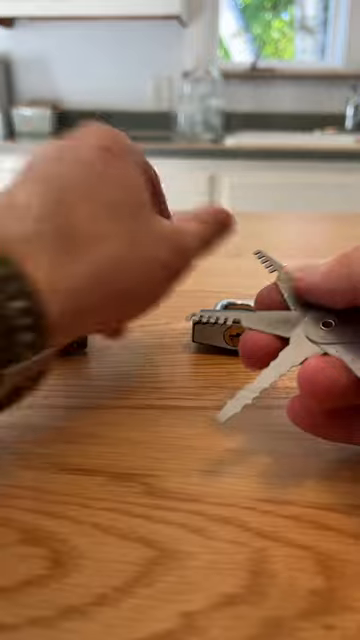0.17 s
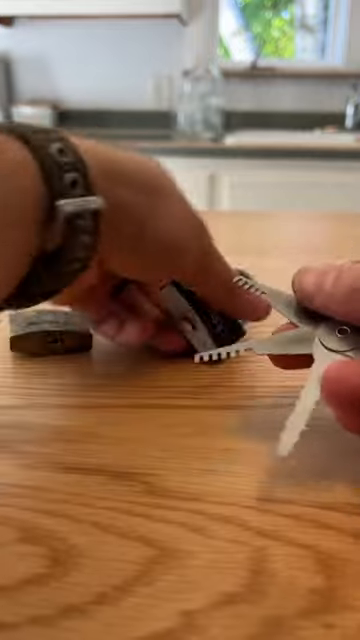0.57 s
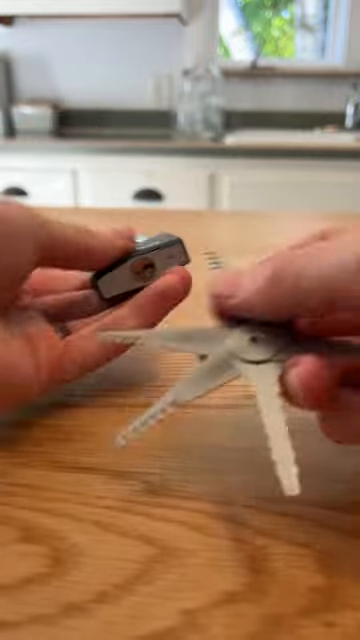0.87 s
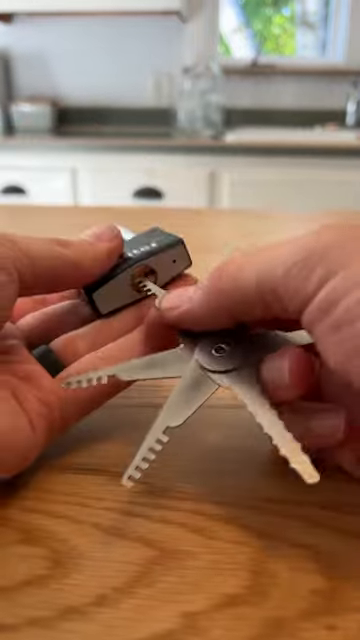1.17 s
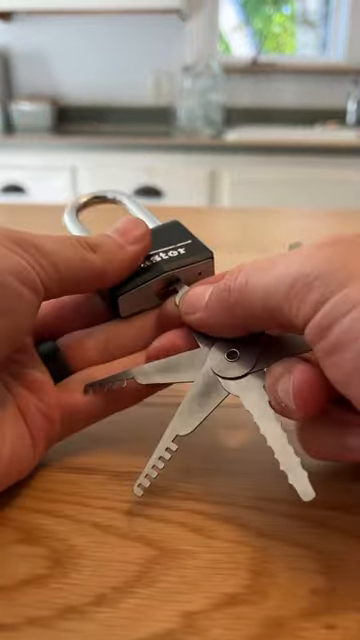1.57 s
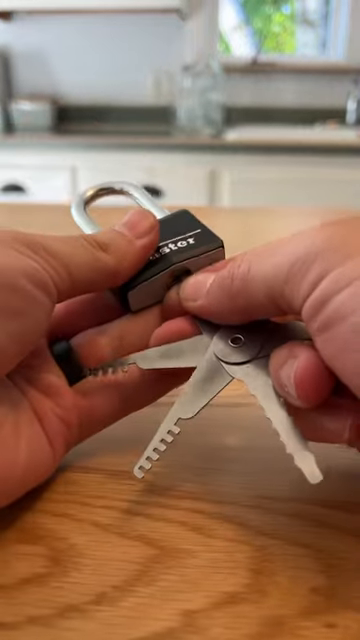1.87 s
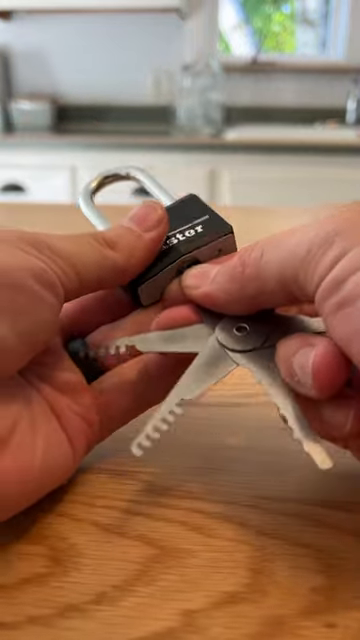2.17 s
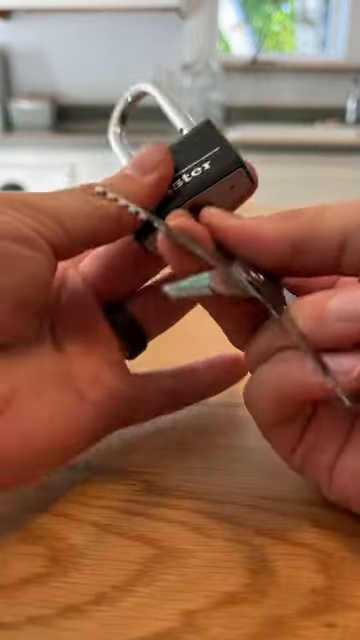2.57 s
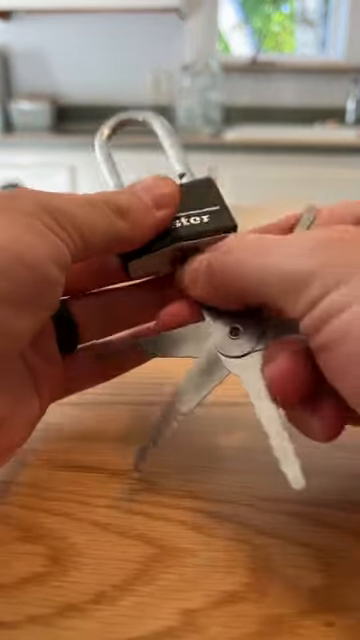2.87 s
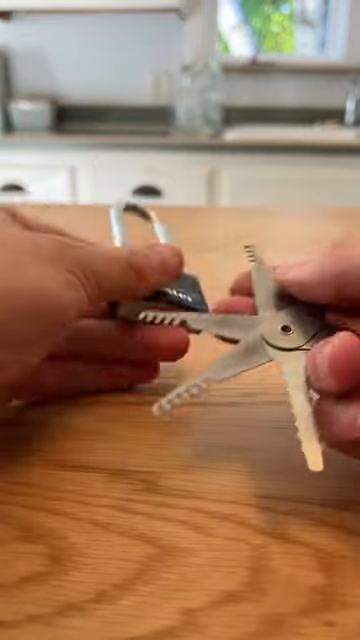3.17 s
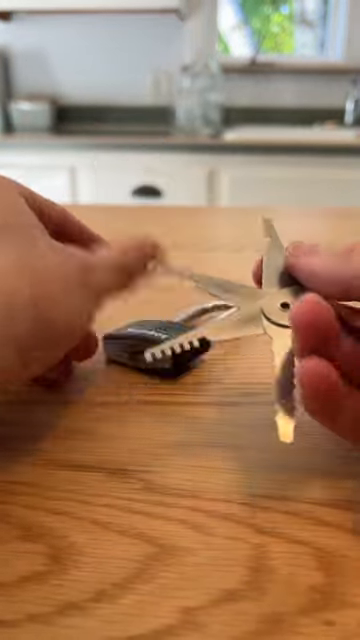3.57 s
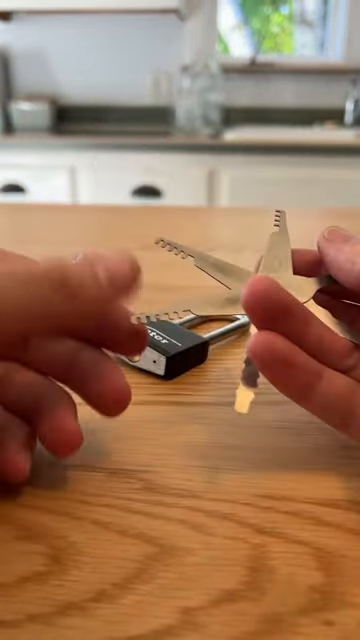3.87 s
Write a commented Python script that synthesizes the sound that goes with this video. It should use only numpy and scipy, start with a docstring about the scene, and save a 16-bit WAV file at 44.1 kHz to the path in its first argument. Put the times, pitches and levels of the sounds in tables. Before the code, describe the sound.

A padlock is picked with small metallic clicks close to the microphone. First it bumps and slides on a wooden table, with a sharp click near 0.9 seconds. Light ticks and scrapes follow from 1.1 seconds, growing stronger until the shackle snaps open at about 2.5. More clicks come, then the lock clatters onto the table around 3.5 seconds. A faint appliance hum fills the slightly echoing kitchen.

```python
"""A hard, humming kitchen: a comb pick ticks inside a steel padlock close to the microphone, and the
shackle springs open. Before and after, the lock is dragged, lifted and dropped on a wooden table.
Ticks and slides are contact noise coloured by the steel; the pick's blade pings in two modes. Blows
ring the table's modes and dragging drives a gliding resonance. The walls answer over appliance hum."""
import sys
import numpy as np
from scipy import signal
from scipy.io import wavfile
from scipy.ndimage import uniform_filter1d

SR = 44100
rng = np.random.default_rng(int(sys.argv[2]) if len(sys.argv) > 2 else 0)


def dump_mix(stems):
    """Bounce the given channels to the path in sys.argv[1] as a 16-bit WAV at rate SR."""
    frames = np.atleast_2d(stems).T  # one column per channel
    limited = np.clip(frames, -1, 1)  # hard clip at full scale
    pcm = np.round(limited * 32767).astype(np.int16)
    wavfile.write(sys.argv[1], SR, pcm)


N = 176400
LEAD = 4410  # samples before time zero


def gain_of(db):
    return 10 ** (np.asarray(db) / 20)


def unit_rms(x):
    return x / np.sqrt(np.mean(x ** 2) + 1e-20)


def curve_at(points, hz):
    point_hz, value = np.transpose(points)
    return np.interp(np.log(hz + 1), np.log(point_hz + 1), value)


def add(mix, start_s, sound):
    part = mix[round(start_s * SR) + LEAD:][:len(sound)]
    part += sound[:len(part)]


def minimum_phase(db):
    log_gain = np.log(gain_of(np.maximum(db, -100)))
    full = np.concatenate([log_gain, log_gain[-2:0:-1]])
    return np.fft.ifft(np.exp(full - 1j * signal.hilbert(full).imag)).real[:1024]


def ring(modes, t):
    return sum(gain_of(db - 60 * t / t60) * np.sin(2 * np.pi * hz * t) for hz, db, t60 in modes)


# Lock body spectrum. Each row: frequency in Hz, relative level in dB.
STEEL_SPECTRUM = [(410, -52.5), (700, -14.5), (1160, -12.5), (2760, -8), (4630, -4), (5730, -11.5),
                  (7780, -12), (8660, -18), (10200, -17.5), (13800, -14), (15100, -15), (16200, -29.5)]

def steel_body(dull_db, bright_db, dull_hz=2970, bright_hz=8800):
    """Unit-energy impulse response of the lock, with a low and a high shelf."""
    hz = np.fft.rfftfreq(4096, 1 / SR)
    dull = 1 / (1 + (hz / dull_hz) ** 4)
    bright = 1 - 1 / (1 + (hz / bright_hz) ** 8)
    body = minimum_phase(curve_at(STEEL_SPECTRUM, hz) + dull * dull_db + bright * bright_db)
    return body / np.linalg.norm(body)


# Steel on steel. Each row: start in seconds, level in dB, low shelf in dB, high shelf in dB,
# contact time in ms.
STEEL_TICKS = [(0.225, -39, 6, -2, 1.8), (0.2964, -22.5, 7, 7.5, 1.7), (0.3007, -15.5, 5, -17, 1.1),
               (0.8609, -6, -19, -1, 0.19), (1.1267, -31, -54, 3, 1.4), (1.1878, -33.5, -21, -4, 0.39),
               (1.2942, -22.5, 8, -2, 0.86), (1.3035, -23.5, -4, -5, 0.44), (1.318, -36, -7, 2, 1.3),
               (1.333, -36, -15, -3.0, 1.3), (1.3454, -45, -13, -1, 1.3), (1.3588, -38.5, -18, -3.0, 1.6),
               (1.3713, -40, -24, 4, 1.3), (1.5921, -31.5, -3, -5, 0.96), (1.6024, -31.5, -21, 4, 4.1),
               (1.611, -27.5, -10, 6, 2.7), (1.614, -44, -23, 24, 1.9), (1.671, -47, -6, 9, 0.61),
               (1.7755, -32.5, 20, 0, 1.4), (2.0561, -15, 3, 0, 0.8), (2.0679, -24, -8.5, -7, 1.3),
               (2.2317, -14, -10, -6, 0.38), (2.2542, -15.5, 4, 7.5, 0.57), (2.325, -29.5, -6.5, 3, 0.68),
               (2.4075, -41, -11, -10, 4.8), (2.4445, -15.5, -10.5, -15, 2.5), (2.4522, 6, -3.5, 0.5, 0.64),
               (2.4561, -19.5, -10.5, -3.5, 1.5), (2.6766, -8, -12.5, 5.5, 1.3),
               (2.6808, -5, -8.5, -4, 0.53), (2.7053, -21, 12, 4, 0.79), (2.7352, -21.5, 4.5, 1, 1.15),
               (2.882, -23, -18.5, 5, 0.64), (2.9135, -21.5, -12, 1, 2.2), (2.9174, -15.5, -7, 12, 0.9),
               (2.9268, -23.5, -24, 12, 1.1), (3.1768, -22, -1.5, -11.5, 0.47),
               (3.3714, -17.5, 15, -11, 0.92), (3.434, -33.5, -6.5, -5, 1.3),
               (3.4645, -32.5, -8.5, -6.5, 1.5), (3.477, -4, 26.5, -1, 1.9), (3.5293, 4.5, -5, 2.5, 0.42),
               (3.5505, -19, -8, -11, 2.3), (3.5834, -1, 32, -11, 0.72), (3.6002, -3.5, 9, 2, 0.62),
               (3.6166, -14.5, -19, -6, 1.6), (3.6206, -14.5, -19.5, 2, 1.5)]

def steel_ticks():
    """Brief gritty contacts ring the lock. Returns direct sound and an equal-energy feed to the walls."""
    direct, to_walls = np.zeros((2, N + LEAD))
    t = np.arange(1024) / SR
    rows = [(-0.07, -10.5, 0, 0, 1.7)] + list(STEEL_TICKS)  # first tick echoes into the opening
    for start_s, db, dull_db, bright_db, contact_ms in rows:
        grit = rng.standard_normal(len(t))
        age = t / (contact_ms / 1000)
        contact = np.sign(grit) * np.sqrt(abs(grit)) * (1 - np.exp(-1.6 * age)) ** 2 * np.exp(-age)
        body = steel_body(dull_db, bright_db)
        tick = signal.fftconvolve(contact, body)
        gain = gain_of(db) * np.sqrt(contact_ms * SR / 6000)
        add(direct, start_s, gain * tick / np.linalg.norm(tick))
        add(to_walls, start_s, gain * body)
    return direct, to_walls


# Pick blade pings. Each row: start in seconds, level per mode in dB.
PICK_PINGS = [(1.594, -43), (1.613, -47), (1.761, -52), (1.775, -41.5), (1.7835, -42.5), (2.2324, -30),
              (2.253, -18.5), (2.42, -49.5), (2.4431, -16), (2.67, -33), (2.743, -39), (2.763, -38),
              (2.7755, -48)]

def pick_pings(blade_hz=4480, t60_s=0.014):
    """A close pair of damped blade modes, detuned by a different grip each time."""
    out, t = np.zeros(N + LEAD), np.arange(3000) / SR
    for start_s, db in PICK_PINGS:
        pair = [(blade_hz * (ratio + 0.01 * rng.standard_normal()), db, t60_s) for ratio in (0.98, 1.025)]
        add(out, start_s, ring(pair, t) * np.minimum(t / 0.00056, 1))
    return out


# Steel and fingers on steel. Each row: start in seconds, length in seconds, level in dB.
STEEL_SLIDES = [(0.294, 0.3, -52), (0.591, 0.036, -53.5), (0.672, 0.34, -57.5), (1.147, 0.019, -56),
                (1.275, 0.04, -51.5), (2.437, 0.04, -33), (2.691, 0.056, -46), (2.926, 0.024, -40.5),
                (3.538, 0.12, -39)]

def steel_slides():
    """Fine, uneven friction hiss under a soft arch, coloured by the lock."""
    out = np.zeros(N + LEAD)
    for start_s, length_s, db in STEEL_SLIDES:
        progress = np.arange(0, 1, 1 / (length_s * SR))
        hiss, roughness = rng.standard_normal((2, 16000))
        friction = hiss * np.exp(0.66 * unit_rms(uniform_filter1d(roughness, 90)))
        arch = np.sin(np.pi * progress ** 0.42) ** 0.5
        add(out, start_s, gain_of(db) * unit_rms(friction[:len(progress)]) * arch)
    return signal.oaconvolve(out, steel_body(dull_db=1.5, bright_db=0.1))[:len(out)]


# Modes of table and lock. Each row: frequency in Hz, relative level in dB, T60 in seconds.
WOOD_MODES = [(145.8, -15.5, 0.29), (191.7, -12, 0.17), (244.4, -5.5, 0.23), (281.2, 1, 0.1),
              (443, -1.5, 0.067), (780, -2.5, 0.073), (917, 0.5, 0.033), (1158, 8, 0.014),
              (1325, 3.5, 0.028), (1579, 8.5, 0.019), (1910, -1, 0.06), (2230, 10, 0.0089),
              (2500, 4, 0.014), (3470, 3.5, 0.007)]
BOOM_HZ, MAX_RING_CYCLES = 600, 24  # top of the boom band; damping by the hands
# Hard blows. Each row: start in seconds, level in dB, boom in dB, tilt above the boom in dB per octave.
TABLE_KNOCKS = [(0.073, -28.5, 12, -3), (0.2152, -27, 14, -4.5), (0.2963, -12.5, -1.5, -9),
                (0.685, -20, 16.5, -9), (0.8595, -16, -6.5, -3.5), (3.3703, -13.5, -3.5, -9),
                (3.4337, -18, 4, -9), (3.477, -4, -13, 5.5), (3.5278, -6.5, -4, -3),
                (3.5845, -4.5, 0.5, 14), (3.5935, -13, -5, -1), (3.6004, -10, -33.5, -4.5),
                (3.634, -16, 0, 2)]
OPENING_KNOCK, LATCH_THUNK = (-0.08, -15.5, 0, -3), (2.4297, -21, 4.4, -11)

def table_knocks(attack_ms=1, clatter_db=-5, rolloff_hz=3730):
    """Short pushes ring the wood and a dense clatter of small modes, varied on every blow."""
    out, t = np.zeros(N + LEAD), np.arange(7000) / SR
    clatter = [(hz, clatter_db, 0.036 * min(1500 / hz, 1.5))
               for hz in np.geomspace(480, 9000, 90 - len(WOOD_MODES))]
    for start_s, db, boom_db, tilt_db in [OPENING_KNOCK, LATCH_THUNK] + list(TABLE_KNOCKS):
        modes = []
        for hz, mode_db, t60 in list(WOOD_MODES) + clatter:
            detune, spread = rng.standard_normal(2)
            mode_db += 1.4 * spread + (boom_db if hz < BOOM_HZ else tilt_db * np.log2(hz / 1200))
            mode_db -= 10 * np.log10(1 + (hz / rolloff_hz) ** 4)
            modes.append((hz * (1 + 0.02 * detune), mode_db, min(t60, MAX_RING_CYCLES / hz)))
        blow = ring(modes[::2], t) - ring(modes[1::2], t)  # alternating polarity
        blow *= 1 - np.exp(-t * 1000 / attack_ms)
        onset_rms = np.sqrt(np.mean(blow[:400] ** 2))
        add(out, start_s, gain_of(db) * 0.4 * blow / onset_rms)
    return out


# Soft blows. Each row: start in seconds, peak in dB.
TABLE_THUMPS = [(0.227, -30.5), (0.307, -23), (0.343, -35), (0.392, -25), (0.696, -31), (0.726, -25),
                (0.79, -35), (0.803, -30), (0.876, -23), (0.936, -28), (0.954, -37), (1.164, -33.5),
                (3.542, -13), (3.627, -18)]

def table_thumps(attack_ms=2.8, top_hz=1050, spread_db=2.5, dull_db=5):
    """Slow pushes reach only the lowest wood modes."""
    out, t = np.zeros(N + LEAD), np.arange(7000) / SR
    low_modes = [mode for mode in WOOD_MODES if mode[0] < top_hz]
    for start_s, db in TABLE_THUMPS:
        modes = []
        for hz, mode_db, t60 in low_modes:
            detune, spread = rng.standard_normal(2)
            mode_db += spread_db * spread - dull_db * (hz > BOOM_HZ)
            modes.append((hz * (1 + 0.014 * detune), mode_db, min(0.74 * t60, MAX_RING_CYCLES / hz)))
        blow = ring(modes, t) * (1 - np.exp(-t * 1000 / attack_ms))
        add(out, start_s, gain_of(db) * blow / abs(blow).max())
    return out


# Lock dragged on wood. Each row: start in seconds, length in seconds, level in dB, start and end
# resonance in Hz, bandwidth in Hz, crest position as a fraction of the length.
LOCK_DRAGS = [(.325, 0.035, -36, 1980, 2220, 970, 0.75), (0.42, 0.079, -36, 910, 1130, 670, 0.53),
              (.475, 0.08, -24, 1244, 770, 340, 0.47), (.44, 0.11, -41.5, 3800, 4020, 1700, 1),
              (.48, 0.048, -35, 1470, 1600, 240, 0.62), (.45, 0.1, -42.5, 2400, 2100, 770, 0.9),
              (.595, 0.03, -39.5, 3600, 4700, 2500, 0.21)]

def lock_drags(grit=0.33):
    """Gritty friction noise in a resonance that glides as the lock tips."""
    out = np.zeros(N + LEAD)
    for start_s, length_s, db, from_hz, to_hz, width_hz, crest in LOCK_DRAGS:
        progress = np.arange(0, 1, 1 / (length_s * SR))
        hiss, roughness = rng.standard_normal((2, 6000))[:, :len(progress)]
        friction = hiss * np.exp(grit * unit_rms(uniform_filter1d(roughness, 60)))
        carrier = np.exp(2j * np.pi * np.cumsum(from_hz + (to_hz - from_hz) * progress) / SR)
        pole = np.exp(-np.pi * width_hz / SR)
        rub = (carrier * signal.lfilter([1], [1, -2 * pole, pole * pole], friction / carrier)).real
        crest = np.clip(crest, 0.1, 0.9)
        arch = np.sin(np.pi / 2 * np.minimum(progress / crest, (1 - progress) / (1 - crest)))
        add(out, start_s, gain_of(db) * unit_rms(rub) * arch)
    return out


def close_reflections(x, level_db=-9, t60_s=0.049):
    """Hands and table top scatter the sound before the walls answer."""
    t = np.arange(1500) / SR
    taps = rng.standard_normal(len(t)) * gain_of(-60 * t / t60_s) * np.minimum(t / 0.00022, 1)
    return gain_of(level_db) * signal.oaconvolve(x, taps / np.linalg.norm(taps))[:len(x)]


# Tail decay per band. Each row: frequency in Hz, T60 in seconds.
ECHO_DECAY = [(200, 0.34), (600, 0.78), (1500, 0.65), (4000, 0.67), (9000, 0.74), (15000, 0.59)]
# Echo colour. Each row: frequency in Hz, relative level in dB.
ECHO_SPECTRUM = [(200, -5), (1000, -9), (4000, -13.5), (9000, -14), (12000, -17), (15300, -16.5)]

def kitchen_reverb(x, predelay_s=0.011):
    """Three dense tails take turns, each band dying at its own rate."""
    out, fade_phase = np.zeros(len(x)), np.arange(len(x)) * 60 / SR
    for k in range(3):
        hz, t, noise = signal.stft(rng.standard_normal(SR), SR, nperseg=256)
        tail_db = -60 * t / curve_at(ECHO_DECAY, hz)[:, None] + curve_at(ECHO_SPECTRUM, hz)[:, None]
        tail = signal.istft(noise * gain_of(tail_db), SR, nperseg=256)[1]
        tail *= np.minimum(np.arange(len(tail)) / 150, 1)
        tail = np.pad(tail, (round(predelay_s * SR), 0)) / 45
        share = np.sqrt(2 / 3) * np.cos(fade_phase + k * np.pi / 3)
        out += signal.fftconvolve(x * share, tail)[:len(x)]
    return out


# Hum colour. Each row: frequency in Hz, relative level in dB.
HUM_SPECTRUM = [(15, -58.5), (25, -38), (74, -35), (103, 4), (142, -13.5), (192, -8), (266, -8),
                (399, -7.5), (433, -16), (483, -12.5), (902, -25.5), (1550, -29), (16500, -64.5)]
# Hum drift. Each row: time in seconds, relative level in dB.
HUM_DRIFT = [(0.0, -39), (2.67, -41.5), (4.0, -40)]

def appliance_hum(quietest_db=-45.5, patch_db=2.03):
    """Low rumble and hiss, patchy and slowly changing in level."""
    frames, hz = N // 256 + 9, np.fft.rfftfreq(1024, 1 / SR)
    real, imag, patches = rng.standard_normal((frames, len(hz), 3)).T
    patches = unit_rms(uniform_filter1d(uniform_filter1d(patches, 6, axis=0), 8, axis=1))
    spectra = (real + 1j * imag) * gain_of(curve_at(HUM_SPECTRUM, hz)[:, None] + patch_db * patches)
    rumble = signal.istft(spectra, nperseg=1024, noverlap=768)[1][512:N + 512]
    drift_db = np.interp(np.arange(N) / SR, *np.transpose(HUM_DRIFT))
    return gain_of(quietest_db + drift_db - drift_db.min()) * unit_rms(rumble)


def scene():
    """Mono mix of direct sound, reflections and hum."""
    ticks, ticks_to_walls = steel_ticks()
    pings, drags = pick_pings(), lock_drags()
    handling = steel_slides() + table_knocks() + table_thumps()
    direct = ticks + pings + drags + handling
    to_walls = ticks_to_walls + gain_of(-8) * pings + gain_of(-4) * drags + handling
    mix = direct + close_reflections(direct) + kitchen_reverb(to_walls)
    return (mix[LEAD:] + appliance_hum())[None]


def record(dry, port_hz=11700, ceiling=0.9, dim_above_hz=15800, remove_above_hz=16990):
    """Small microphone: bass cut, port resonance, soft overload.
    Separately, the top treble is turned down, and the very top removed."""
    cut = signal.sosfilt(signal.butter(2, 60, "high", fs=SR, output="sos"), dry)
    ported = cut + gain_of(2.5) * signal.lfilter(*signal.iirpeak(port_hz, Q=5.5, fs=SR), cut)
    lower = signal.oaconvolve(ported, signal.firwin(255, dim_above_hz, fs=SR)[None], "same")
    dimmed = lower + gain_of(-12) * (ported - lower)
    clipped = ceiling * np.tanh(dimmed / ceiling)
    lowpass = signal.firwin(511, remove_above_hz, window=("kaiser", 9), fs=SR)
    return signal.oaconvolve(clipped, lowpass[None], "same")


dry = scene()
out = record(dry)
dump_mix(out)
```